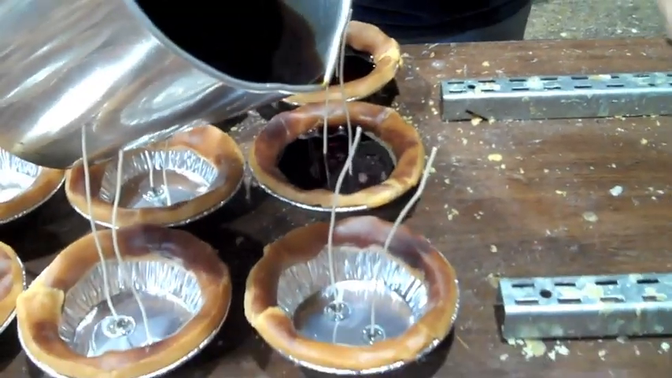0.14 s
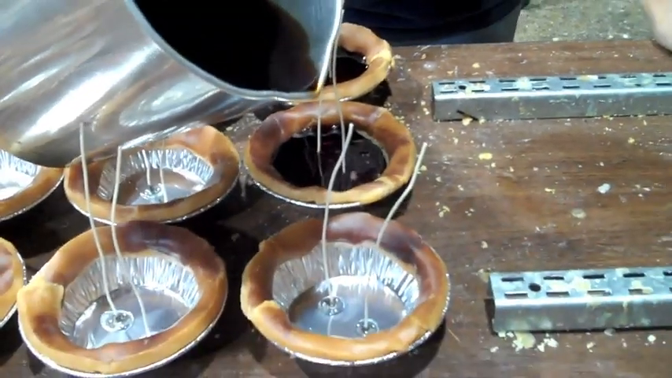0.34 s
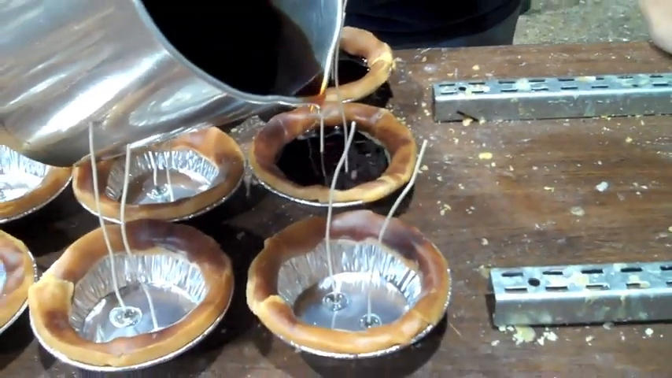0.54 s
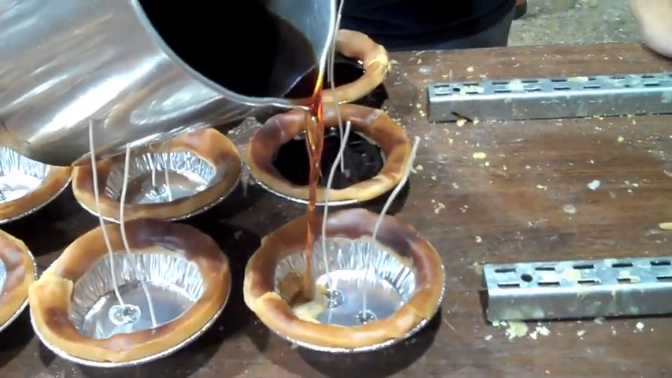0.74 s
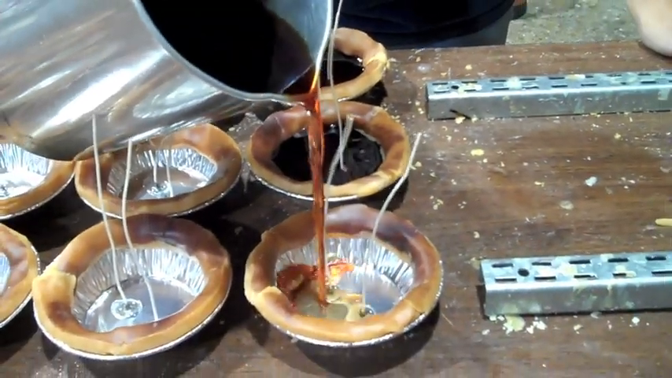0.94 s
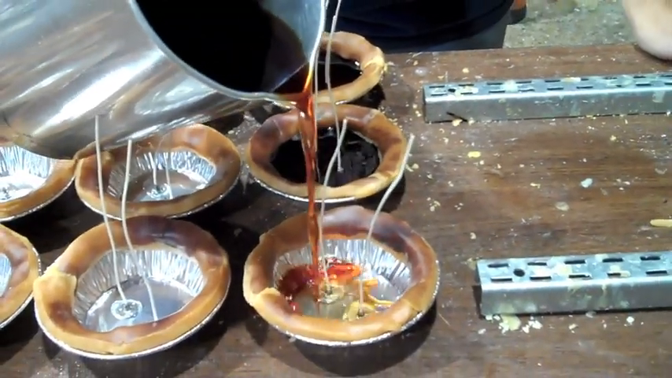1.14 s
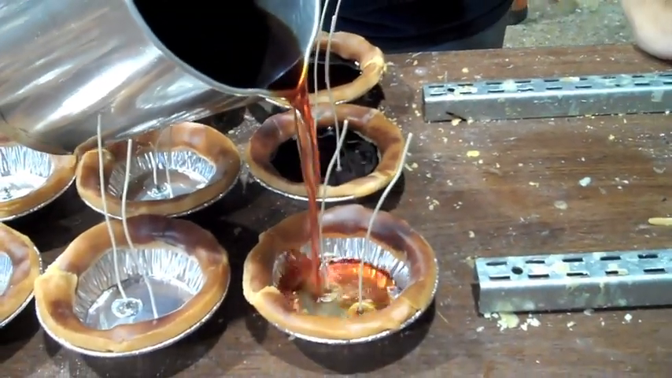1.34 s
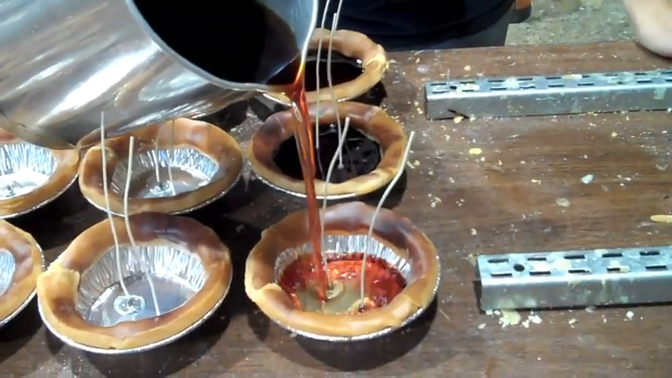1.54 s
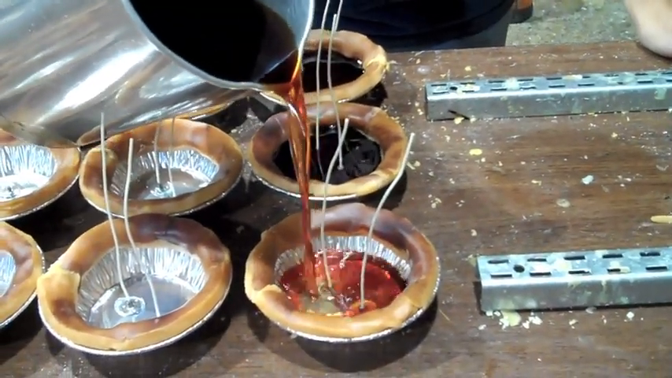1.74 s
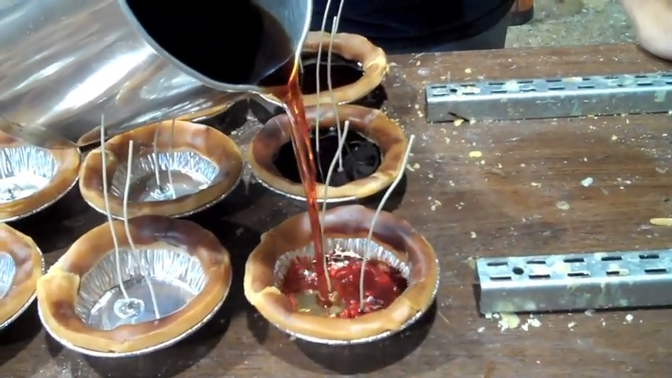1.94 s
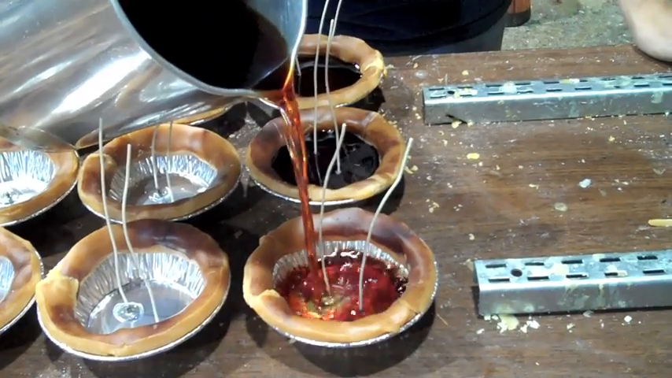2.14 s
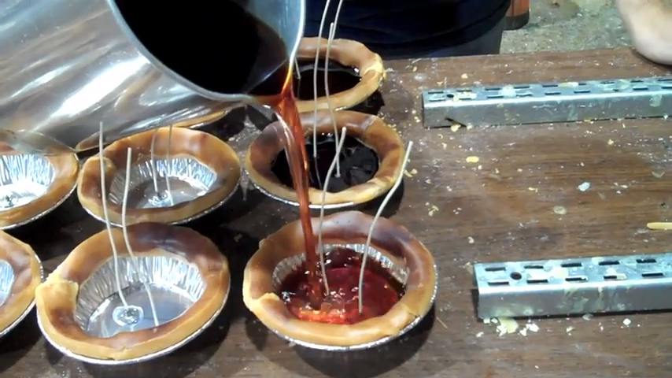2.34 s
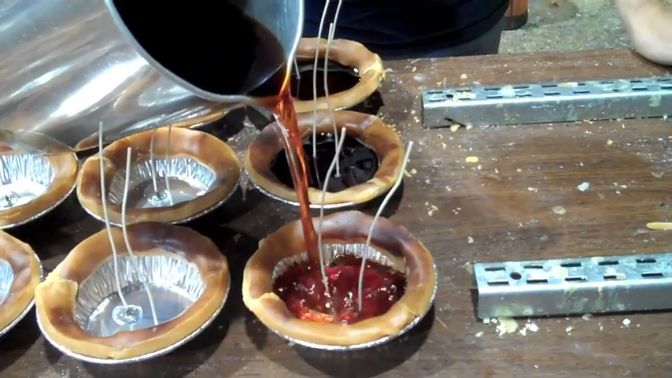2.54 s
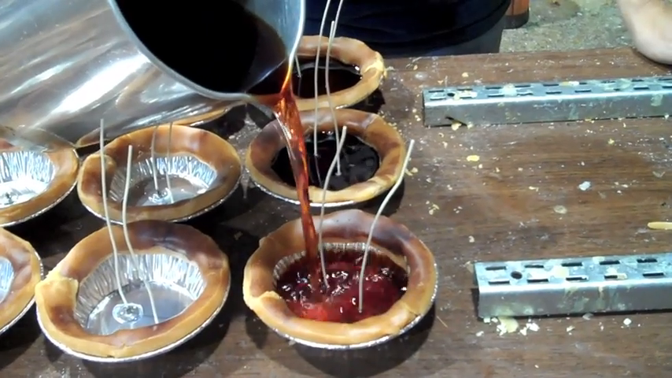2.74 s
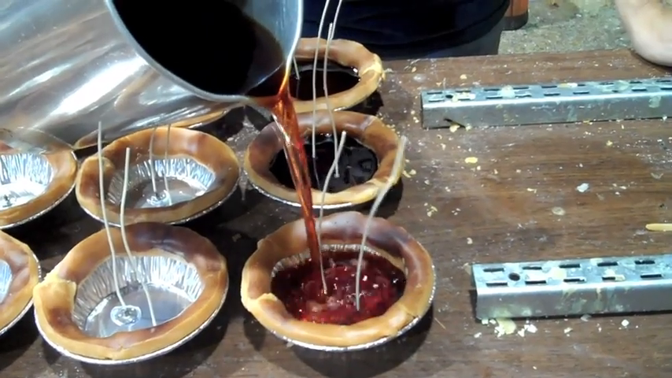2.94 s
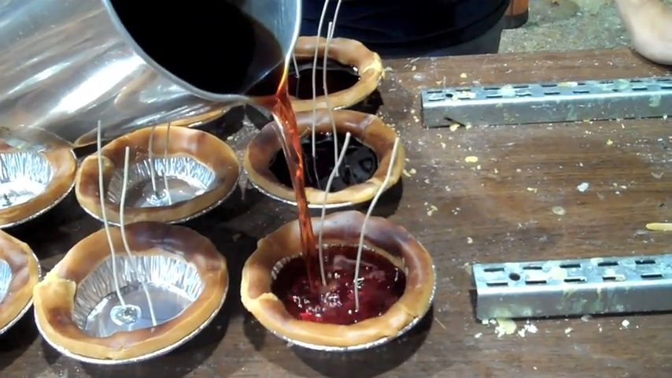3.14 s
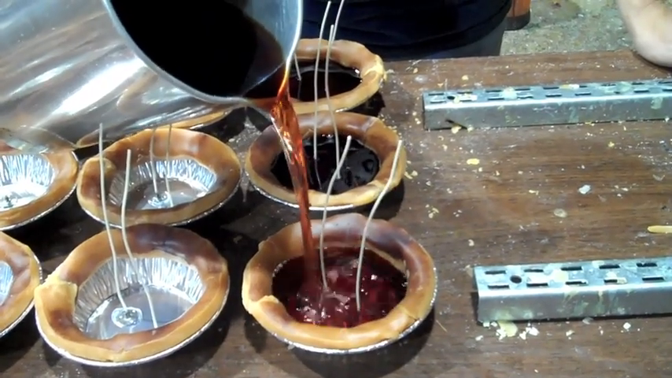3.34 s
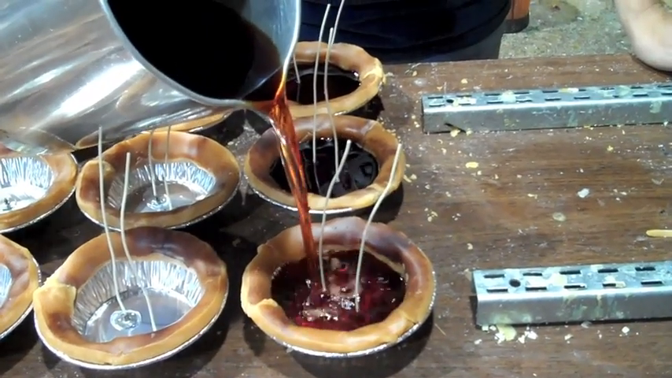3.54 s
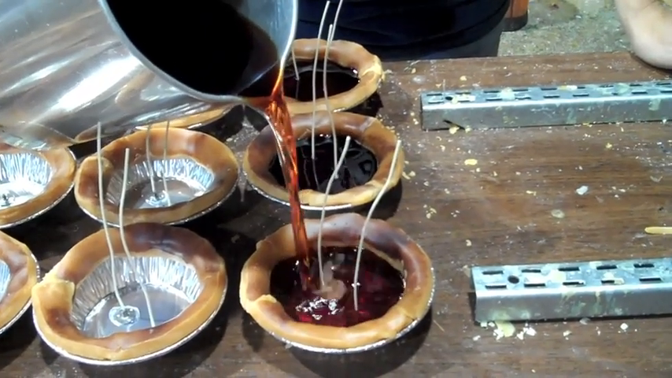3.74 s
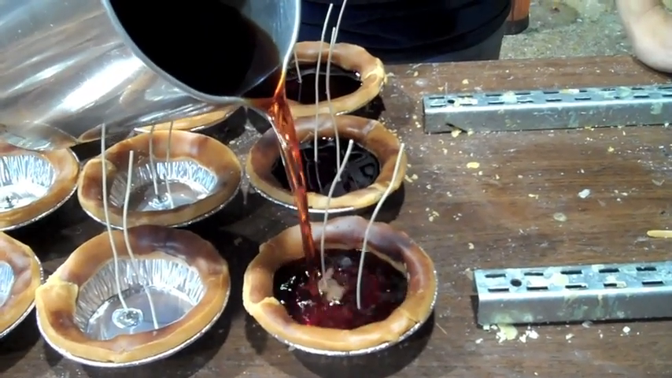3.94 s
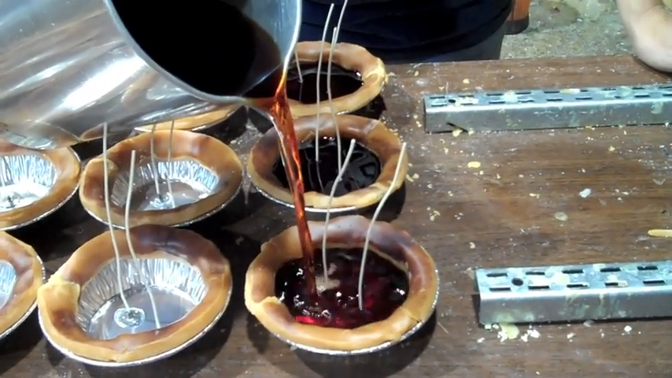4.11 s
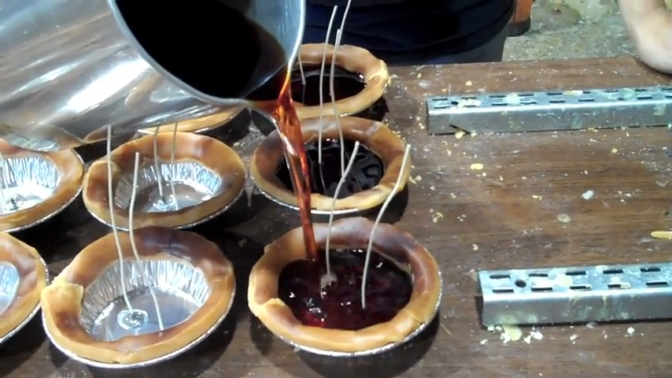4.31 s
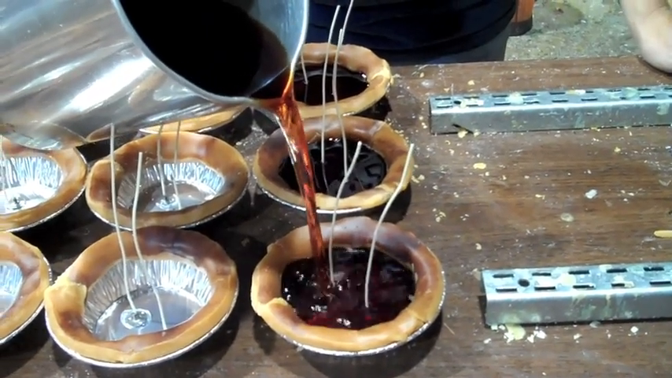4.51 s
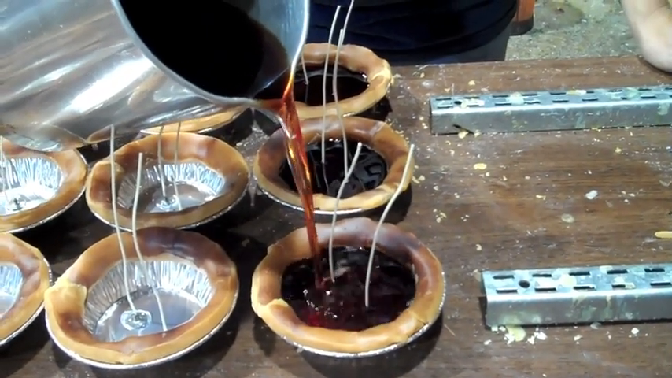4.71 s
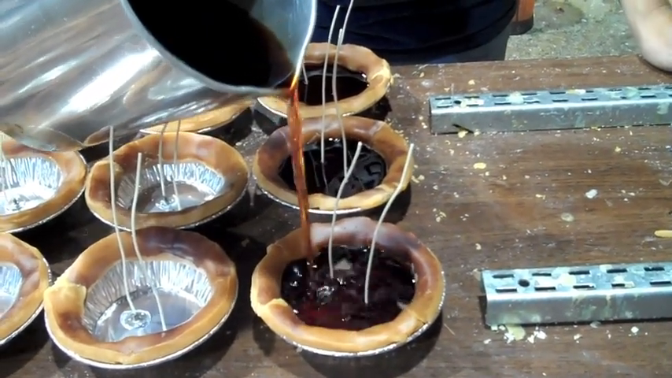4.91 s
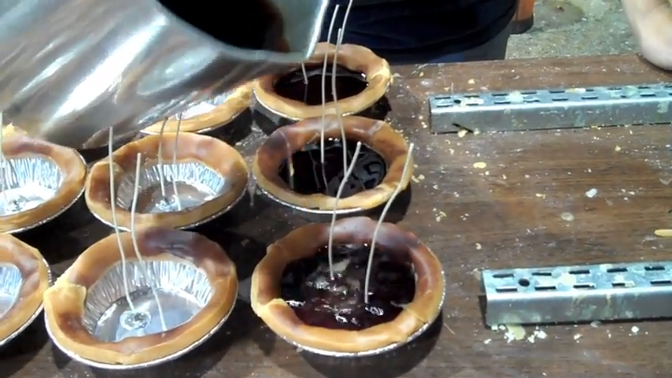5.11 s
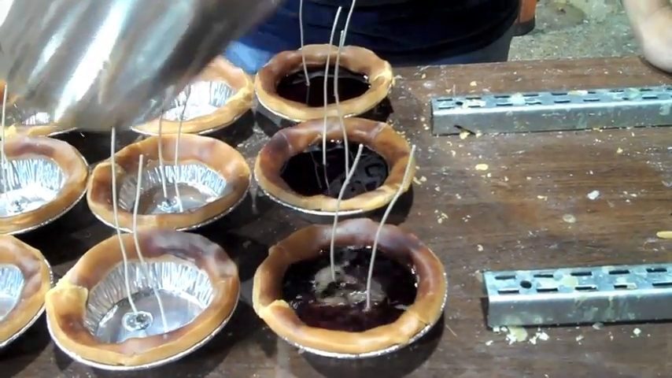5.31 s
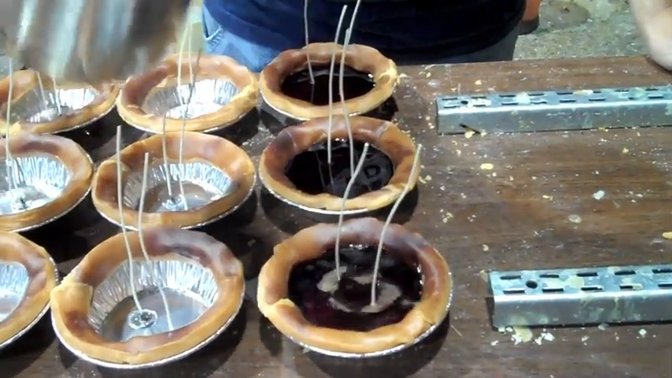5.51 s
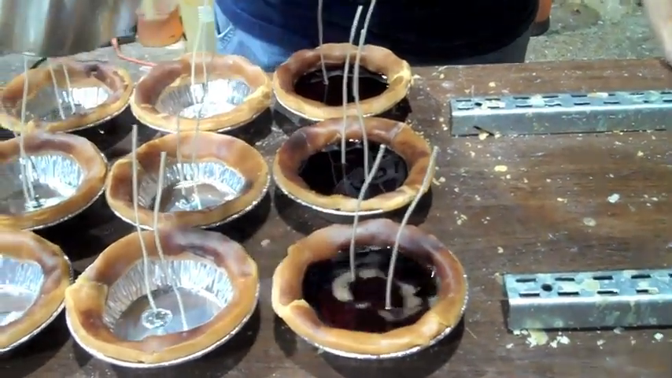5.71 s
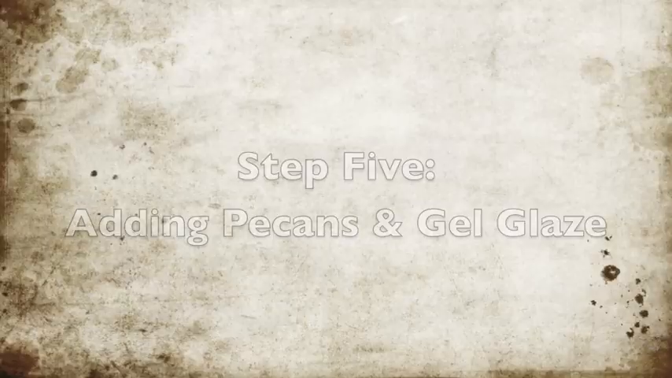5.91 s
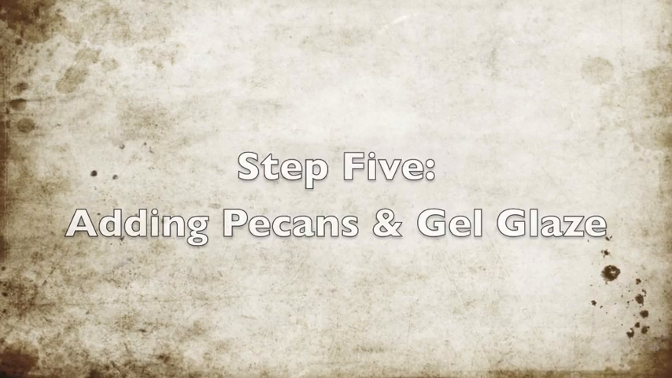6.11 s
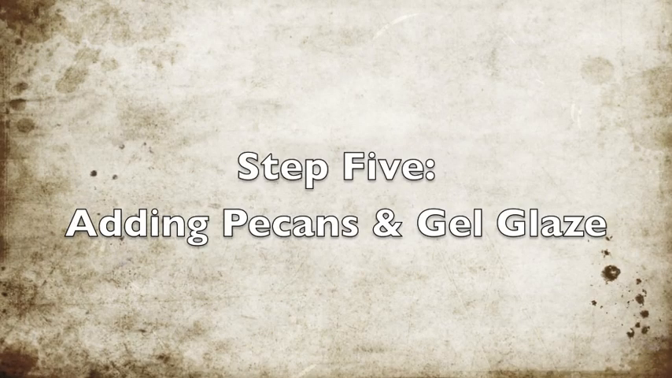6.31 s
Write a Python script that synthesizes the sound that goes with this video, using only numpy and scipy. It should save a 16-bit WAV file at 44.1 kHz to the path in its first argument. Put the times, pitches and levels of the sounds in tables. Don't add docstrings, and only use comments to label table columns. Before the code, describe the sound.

Hot liquid wax splats onto thin foil, then trickles and gurgles into its own pool over a low ventilation drone, fading quickly to silence.

```python
import sys
import numpy as np
from scipy import signal
from scipy.fft import rfft, irfft, next_fast_len
from scipy.io import wavfile
from scipy.ndimage import map_coordinates

SR = 44100
rng = np.random.default_rng(int(sys.argv[2]) if len(sys.argv) > 2 else 0)


def convert_level_to_amplitude(level_db):
    exponent = np.asarray(level_db, float) / 20
    return 10 ** exponent


def dump(signal):
    limited = np.clip(np.atleast_2d(signal).T, -1, 1)
    pcm = np.round(limited * 32767).astype(np.int16)
    wavfile.write(sys.argv[1], SR, pcm)


N = 280343

# (time [s], flow level [dB], trapped air level [dB])
POUR = [(0.685, -52.5, 16.5), (0.8, -65.5, 0.5), (1.29, -61, -3), (1.42, -49.5, 8.5), (1.75, -38.5, -3.5),
        (2.0, -60.5, -1), (2.22, -56, 5.5), (2.48, -40, -6.5), (2.72, -39, -4.5), (2.87, -45.5, -5),
        (3.2, -48.5, -29), (3.36, -34.5, -3), (3.5, -51.5, -10.5), (3.7, -45, -27), (3.95, -50.5, -17),
        (4.45, -54.5, 0), (4.95, -42.5, -13), (5.3, -62.5, -4)]
# (frequency [Hz], level [dB per Hz])
FOIL_SLAP = [(700, -37), (1400, -6), (2600, -2.5), (3500, -4), (4600, -3), (7000, -7.5), (12000, -5)]


def along(points, hz):
    f, v = np.transpose(points)
    return np.interp(np.log(hz + 1), np.log(f + 1), v)


def wobble(rate):
    knots = rng.standard_normal(int(N * rate / SR) + 4)
    return map_coordinates(knots, [np.arange(N) * rate / SR])


def filtered(x, response):
    m = next_fast_len(N + 8192)
    hz = np.fft.rfftfreq(m, 1 / SR)
    return irfft(rfft(x, m) * response(hz), m)[..., :N]


def port(hz):
    # (resonance [Hz], width [Hz], roll-off [Hz])
    cavities = [(7250, 1140, 18000), (6074, 780, 7800)]
    left_late_s = 27e-6
    left, right = [c * c / (c * c - hz * hz + 1j * hz * width) / (1 + 1j * hz / top) ** 2
                   for c, width, top in cavities]
    return np.array([left * np.exp(-2j * np.pi * hz * left_late_s), right])


def at_source(db, hz):
    return db - 10 * np.log10(np.mean(np.abs(port(hz)) ** 2, 0))


def rush(gain):
    # (frequency [Hz], correlation [1])
    likeness = [(60, 0.82), (130, 0.98), (290, 0.95), (640, 0.92), (1410, 0.76), (3100, 0.04),
                (6820, 0.028), (15000, 0.06)]

    def turn(hz):
        return np.arccos(np.clip(along(likeness, hz), -1, 1)) / 2

    noise = rng.standard_normal((2, N))
    mid, side = filtered(noise, lambda hz: gain(hz) * [np.cos(turn(hz)), np.sin(turn(hz))])
    pair = np.array([mid + side, mid - side])
    return pair / pair.std()


def hiss(gain, apart):
    shared, *own = filtered(rng.standard_normal((3, N)), gain)
    pair = shared + apart * np.array(own)
    return pair / pair.std()


def puffs(s, db, t60, attack, size=2048):
    t = np.arange(size) / SR
    blows = np.bincount((s * SR).astype(int), convert_level_to_amplitude(db), N)
    return signal.fftconvolve(blows, convert_level_to_amplitude(-60 * t / t60) * (1 - np.exp(-t / attack)))[:N]


def bubbles(s, db, hz, t60, rise, attack, size=1024):
    s, db, hz, t60, rise = [np.ravel(v)[:, None] for v in np.broadcast_arrays(s, db, hz, t60, rise)]
    t = np.arange(size) / SR
    t60 = np.clip(t60, 1e-3, 1)
    turns = hz * t * (1 + rise * np.minimum(t / t60, 1) / 2)
    tone = convert_level_to_amplitude(db - 60 * t / t60) * (1 - np.exp(-t / attack)) * np.sin(2 * np.pi * turns)
    tone = tone * np.hanning(2 * size)[size:]
    at = (s * SR).astype(int) + np.arange(size)
    return np.bincount(at.ravel(), tone.ravel(), N + size)[:N]


def cluster(s, db, hz, t60, scatter, spread_s, attack, count=3):
    s, db, hz, t60 = [np.reshape(v, (-1, 1)) for v in (s, db, hz, t60)]
    late, pitch, weak, rise = rng.random((len(s), 4, count)).transpose(1, 0, 2)
    late[:, 0], pitch[:, 0], weak[:, 0] = 0, .5, -.5
    near_hz = hz * np.exp(scatter * (2 * pitch - 1))
    return bubbles(s + spread_s * late, db - 8 * weak, near_hz, t60, 0.23 * rise, attack)


def in_tin(s, db, hz, t60, scatter, spread_s, attack, echo_db, echo_s):
    direct = cluster(s, db, hz, t60, scatter, spread_s, attack)
    echo = [cluster(s + spread_s, db + echo_db, hz, 2 * t60, 2 * scatter, echo_s, attack) for _ in range(2)]
    return direct + np.array(echo)


def scattered(count):
    at, size, *draws = rng.random((count, 4)).T
    s, flow_db, air_db = np.transpose(POUR)
    at = s[0] + at * (s[-1] - s[0])
    return at, np.interp(at, s, flow_db), np.interp(at, s, air_db), -np.log(size + .05), *draws


def workshop():
    # (frequency [Hz], level [dB per Hz])
    fan_rumble = [(24, -38.5), (40, -12.5), (70, -6.5), (142, 1), (210, -5.5), (240, -9), (278, -12.5),
                  (350, -12), (388, -13.5), (411, -8), (840, -13.5), (903, -19), (1300, -23), (1690, -45),
                  (2860, -120)]
    # (frequency [Hz], width [Hz], gain [dB])
    duct_modes = [(146, 9.9, 3.5), (198, 12, 5.5), (362.5, 15, 8.5), (396, 20, 3.5), (508.5, 7.5, 6.5),
                  (703, 7.2, 8), (748, 37, 4), (840, 7.3, 11), (968, 8.5, 11), (1150, 4, 15.5)]
    # (frequency [Hz], level [dB per Hz])
    far_air = [(700, -31), (1000, -0.5), (1600, -3), (3000, -4.5), (5000, -9.5), (7000, -14), (8500, -12.5),
               (11000, -15.5), (15000, -11.5)]
    low_hum = {1: -65, 2: -57.5, 2.829: -64}
    high_buzz = {39: -82, 50: -83, 51: -81, 52: -84.5, 53: -82, 55: -80, 56: -78.5, 57: -81, 58: -75.5, 59:
                 -81, 60: -81.5}
    mains_hz, motor_hz = 120.04, 28.23
    t = np.arange(N) / SR

    def ducts(hz):
        return 1 + sum((convert_level_to_amplitude(db) - 1) / (1 + (2 * (hz - c) / w) ** 2) for c, w, db in duct_modes)

    rumble = convert_level_to_amplitude(-45.0 + 0.16 * wobble(2.7)) * rush(lambda hz: convert_level_to_amplitude(along(fan_rumble, hz)) * ducts(hz))
    far = convert_level_to_amplitude(-52) * rush(lambda hz: convert_level_to_amplitude(along(far_air, hz)) * (hz > 600))
    slip = 2 * np.pi * (t - .03) / 2.65
    motor = 2 * np.pi * motor_hz * t
    beat = np.sin(motor) + .7 * np.sin(motor + slip)
    hum = 0
    for k, db in {**low_hum, **high_buzz}.items():
        between_ports = np.clip(k / 30, 0, 2) * rng.standard_normal((2, 1))
        phase = 2 * np.pi * rng.random() + between_ports + 0.16 * wobble(3.0)
        level = convert_level_to_amplitude(db + 5.5 + 1.1 * wobble(4.5))
        hum = hum + level * np.sin(2 * np.pi * k * mains_hz * t + phase)
    return rumble + far + convert_level_to_amplitude([[-60.5], [-57]]) * beat + hum


def froth(level_db, centre_hz, scatter, cycles, clump_db, size_db, count):
    s, pitch, size, rise = rng.random((count, 4)).T
    s = POUR[0][0] + s * (POUR[-1][0] - POUR[0][0])
    hz = centre_hz * np.exp(scatter * (2 * pitch - 1))
    clump = clump_db * wobble(45)[(s * SR).astype(int)]
    db = np.interp(s, np.transpose(POUR)[0], level_db) + clump - size_db * np.log(size)
    return bubbles(s, db, hz, cycles / hz, 0.16 * rise, attack=0.00067, size=512)


def stream():
    s, fizz_db, air_db = np.transpose(POUR)
    gurgle_db = fizz_db + air_db

    def flow(db):
        return np.interp(np.arange(N) / SR, s, db, -120, -120)

    flicker = 2 * wobble(30) + 3.5 * wobble(140)
    bright = hiss(lambda f: convert_level_to_amplitude(along(FOIL_SLAP, f)) / (1 + (3600 / (f + 1)) ** 4), apart=0.59)
    wash = convert_level_to_amplitude(flow(fizz_db) - 12.5 + flicker) * bright
    dull = hiss(lambda f: convert_level_to_amplitude(along(FOIL_SLAP, f)) / (1 + (f / 3500) ** 6), apart=.3)
    slosh = convert_level_to_amplitude(flow(gurgle_db) - 12.5 + 6.2 * wobble(40)) * dull
    fizz = froth(fizz_db - 4.5, 6000, .6, cycles=40, clump_db=1.5, size_db=1.5, count=4000)
    gurgle = froth(gurgle_db - 3, 2250, .4, cycles=30, clump_db=2, size_db=1.5, count=1600)
    return wash + slosh + fizz + gurgle


def burble():
    at, flow_db, air_db, size, pitch, _ = scattered(count=120)
    db = -43.5 + 0.48 * (flow_db + air_db + 48.5) + 3.9 * size
    return np.transpose([at, db, 1750 * 2.1 ** pitch])


def gulps():
    # (time [s], peak level [dB], pitch [Hz])
    pockets = [(0.6877, -30, 2960), (0.932, -30.5, 2520), (0.9345, -28.5, 1622), (0.936, -34.5, 1190),
               (1.0262, -28, 2710), (1.2001, -32.5, 2740), (1.4234, -37, 1370), (1.425, -27.5, 2560),
               (1.462, -23.5, 3080), (1.492, -26.5, 2500), (4.6515, -38.5, 2330), (1.5971, -31, 2510),
               (1.6708, -25, 2340), (0.9345, -40.5, 760), (1.7463, -19, 2840), (2.085, -31, 2230),
               (2.121, -32.5, 2480), (2.1392, -35.5, 2130), (2.2463, -34, 3000), (2.3965, -37, 2350),
               (2.4954, -34.5, 1830), (3.603, -34.5, 2840), (3.3485, -36, 2020), (3.3525, -29.5, 3120),
               (3.3938, -28, 2160), (4.4737, -32, 2130), (4.693, -34, 2200), (4.795, -35, 2000),
               (4.8672, -35.5, 2010), (4.9518, -32, 3690)]
    s, db, hz = np.vstack([pockets, burble()]).T
    slow = dict(scatter=.18, spread_s=.003, attack=.001, echo_db=-12, echo_s=.008)
    ring = in_tin(s, db + 0.5, hz, 30 / hz, **slow)
    slosh = hiss(lambda f: convert_level_to_amplitude(along(FOIL_SLAP, f)) / (1 + (f / 3300) ** 6), apart=0.26)
    return ring + puffs(s, db - 10.5, t60=0.041, attack=0.0013) * slosh


def spatter():
    # (time [s], peak level [dB], pitch [Hz])
    more_splats = [(1.3884, -28, 7850), (1.404, -33.5, 4350), (1.451, -30.5, 5900), (1.4653, -22.5, 5870),
                   (1.52, -32, 4600), (1.6552, -29.5, 8000), (1.6944, -34.5, 5900), (1.7636, -26.5, 7500),
                   (1.8577, -30, 6100), (1.9095, -24, 4400), (2.0716, -37.5, 7140), (2.1158, -26, 7830),
                   (2.2725, -33, 6950), (2.352, -36.5, 7560), (2.5793, -30, 8100), (2.6186, -31, 6200),
                   (2.7256, -26.5, 7860), (2.96, -24, 7480), (3.0514, -37.5, 6300), (3.2206, -33.5, 5900),
                   (3.3564, -26, 4500), (3.558, -31.5, 7800), (3.611, -34, 5720), (3.6534, -30.5, 7400),
                   (4.017, -37.5, 5400), (4.639, -34.5, 5940), (4.8036, -33.5, 4870), (4.8689, -45, 7740),
                   (4.9036, -48, 7160), (5.1763, -41.5, 5600)]
    spray_db = -22
    at, flow_db, _, size, pitch, fine = scattered(count=90)
    db = -39 + .9 * (flow_db + 46) + 1.6 * size
    small = np.transpose([at, db, 4600 * 1.75 ** pitch, spray_db + 16 * (fine - .5)])
    clear = np.pad(more_splats, ((0, 0), (0, 1)), constant_values=spray_db)
    return np.vstack([clear, small])


def splats():
    # (time [s], peak level [dB], pitch [Hz], spray level [dB])
    on_foil = [(0.6892, -27.5, 7100, -17), (0.706, -30.5, 6020, -18), (0.717, -24, 7700, -13.5),
               (0.8458, -29.5, 7760, -22), (0.982, -11, 6690, -13.5), (1.0055, -26.5, 7700, -12),
               (1.0271, -25.5, 5960, -24), (1.3234, -14.5, 7720, -20), (1.352, -24, 7400, -17),
               (1.369, -33, 6600, -26), (1.4226, -23, 6200, -26), (1.4392, -30.5, 9600, -0.5),
               (1.461, -17, 7730, -22), (1.4735, -28, 7660, -24), (1.492, -22, 5750, -33),
               (1.535, -25.5, 7500, -10.5), (1.5445, -19.5, 6900, -28), (1.56, -33, 5660, -18.5),
               (1.5769, -27.5, 4420, -20.5), (1.5948, -26.5, 7140, -13.5), (1.613, -32, 7000, -4),
               (1.6281, -17, 7500, -24.5), (1.6667, -23, 5960, -26), (1.682, -34, 5800, -4),
               (1.724, -23.5, 4930, -23), (1.7418, -22.5, 7500, -18.5), (1.7825, -23, 7070, -35),
               (1.8848, -23.5, 5400, -40), (1.9029, -22, 7570, -12.5), (1.9656, -36, 7600, -27)]
    # (time [s], peak level [dB], pitch [Hz], spray level [dB])
    in_pool = [(2.0482, -11.5, 7040, -41.5), (2.095, -22, 7900, -24), (2.1068, -26.5, 6300, -15),
               (2.1355, -19.5, 7600, -23), (2.2386, -24.5, 7600, -34), (2.3201, -30, 5800, -14.5),
               (2.3396, -24, 5770, -35), (2.397, -19.5, 7500, -20), (2.4703, -23, 7030, -12.5),
               (2.4887, -25, 7940, -17), (2.5123, -27, 6100, -14), (2.54, -25, 7900, -26),
               (2.9392, -27.5, 7250, -32), (3.3138, -17, 5890, -23.5), (3.348, -31.5, 4530, -15),
               (3.374, -27.5, 5830, -34), (3.393, -23.5, 8060, -21), (3.5736, -26, 9050, -21),
               (3.751, -34.5, 7500, -15.5), (3.9789, -24.5, 6420, -36), (4.2279, -29, 5770, -31),
               (4.4532, -28.5, 6160, -28), (4.736, -33, 7600, -31), (4.771, -27.5, 6350, -26),
               (4.788, -24, 5620, -28.5), (4.848, -30, 7440, -14.5), (4.939, -31, 4330, -4),
               (4.9537, -26.5, 5570, -8), (4.983, -30.5, 6300, -16.5), (5.005, -23, 8880, -18)]
    # (time [s], peak level [dB], pitch [Hz], spray level [dB])
    last_drip = [
        (5.199, -29, 5600, -20.5),
    ]
    s, db, hz, spray_db = np.vstack([on_foil, in_pool, last_drip, spatter()]).T
    slap_db = -9.5 - 6.5 * np.log2(hz / 6000) - 0.43 * (db + 26.5)
    slap_db = slap_db - 3.5 * (s > on_foil[-1][0])
    quick = dict(scatter=.12, spread_s=.0015, attack=.001, echo_db=-17, echo_s=.006)
    ring = in_tin(s, at_source(db, hz) + 6.0, hz, 36 / hz, **quick)
    blow = puffs(s, db + slap_db + 9, t60=.011, attack=0.0017)
    foil_tail = puffs(s, db + slap_db - 9.5, t60=0.086, attack=.003)
    slap = (blow + foil_tail) * hiss(lambda f: convert_level_to_amplitude(along(FOIL_SLAP, f)), apart=0.1)
    mist = hiss(lambda f: 1 / (1 + (9500 / (f + 1)) ** 8) / (1 + (f / 13000) ** 4), apart=0.33)
    spray = puffs(s, db + spray_db + 20.5, t60=0.0081, attack=0.0018) * mist
    return ring + slap + spray * convert_level_to_amplitude([[0], [-6]])


def snaps():
    # (time [s], peak level [dB])
    films = [
        (0.9827, -21),
        (2.0495, -22),
        (2.529, -29),
        (4.7722, -11.5),
        (5.017, -29),
    ]
    s, db = np.transpose(films)
    hz, t60 = np.full_like(s, 7500), np.full_like(s, .002)
    return cluster(s, at_source(db, 7500) + 3.5, hz, t60, scatter=0.27, spread_s=0.00052, attack=.0001)


def valve():
    # (time [s], level [dB])
    breaths = [
        (1.212, -52.5),
        (3.2, -51),
        (5.2, -50),
    ]
    s, db = np.transpose(breaths)
    jet = hiss(lambda f: 1 / (1 + ((f - 5500) / 600) ** 4), apart=1.6)
    return puffs(s, db, t60=0.38, attack=0.0068, size=20000) * jet * convert_level_to_amplitude([[-3], [0]])


def scene():
    return workshop() + stream() + gulps() + splats() + snaps() + valve()


def thinned(x):
    # (frequency [Hz], level [dB])
    weakest = [(7000, -20), (8500, -3), (10000, -1.2), (14200, -.5), (14400, 8)]
    hz, _, z = signal.stft(x, SR, "cosine", nperseg=2048)
    band = np.arange(len(hz)) // 16
    starts = np.flatnonzero(np.diff(band, prepend=-1))
    power = np.add.reduceat(np.sum(np.abs(z) ** 2, 0), starts)
    usual = np.percentile(power, 35, axis=1, keepdims=True)
    kept = power[band] > usual[band] * convert_level_to_amplitude(along(weakest, hz))[:, None] ** 2
    return signal.istft(z * kept, SR, "cosine", nperseg=2048)[1][:, :N]


def band_limit(x):
    return signal.sosfilt(signal.butter(12, 15840, fs=SR, output="sos"), x)


def record(dry):
    # (start [s], end [s])
    fade_start, fade_end = (5.72, 5.825)
    heard = filtered(dry, port) + convert_level_to_amplitude(-62.0) * rng.standard_normal((2, N))
    limited = filtered(thinned(heard), lambda hz: np.where(hz < 14300, 1, convert_level_to_amplitude(-14)))
    left = np.clip((fade_end - np.arange(N) / SR) / (fade_end - fade_start), 0, 1)
    return band_limit(limited * np.sin(np.pi / 2 * left) ** 1.4)


dry = scene()
out = record(dry)
dump(out)
```